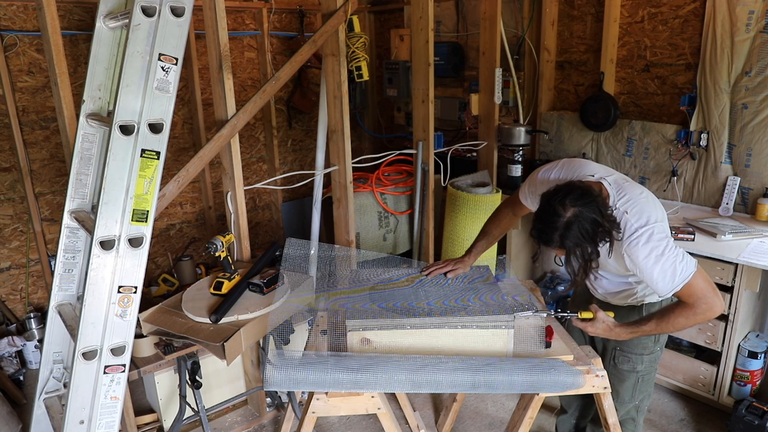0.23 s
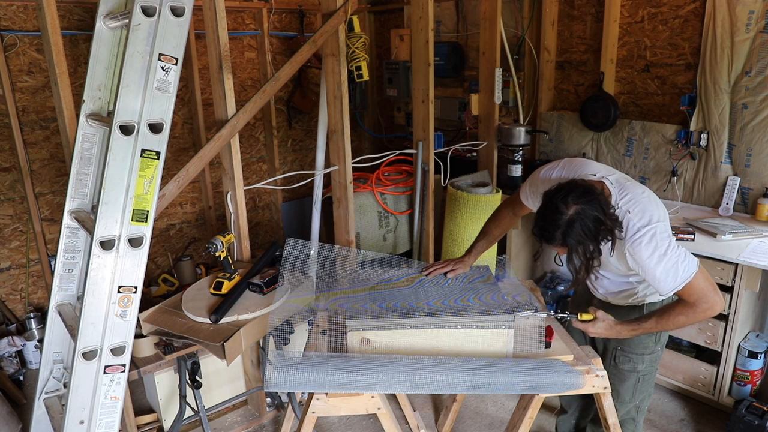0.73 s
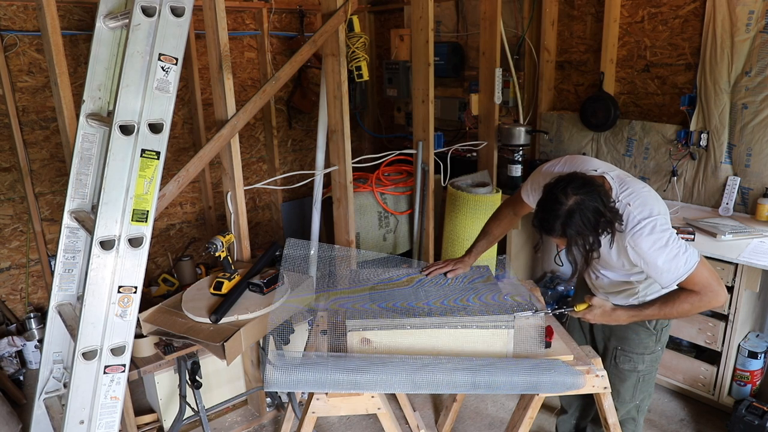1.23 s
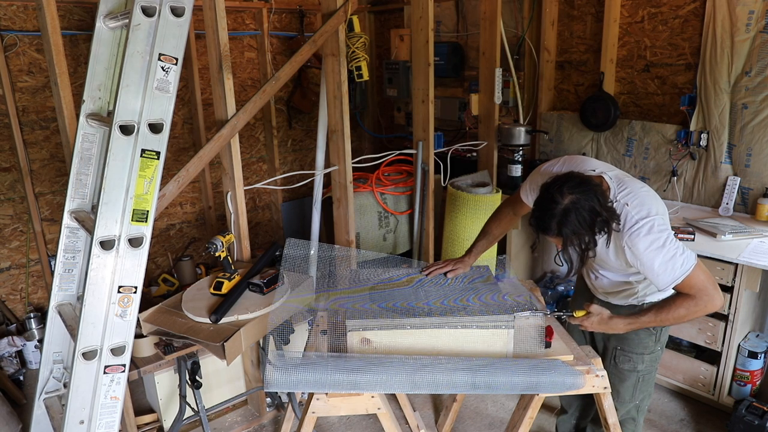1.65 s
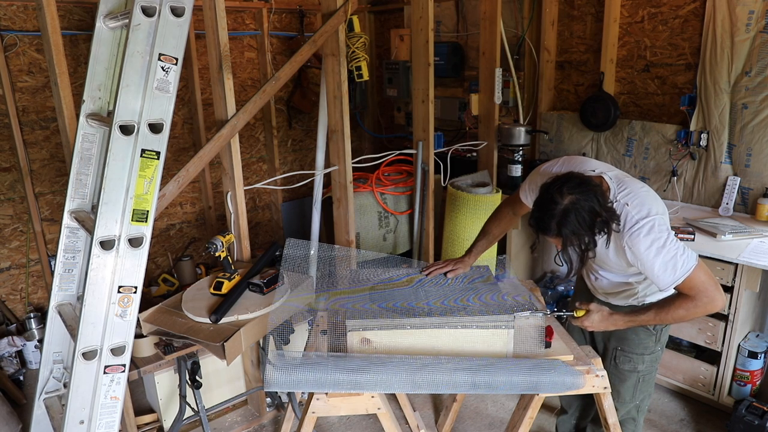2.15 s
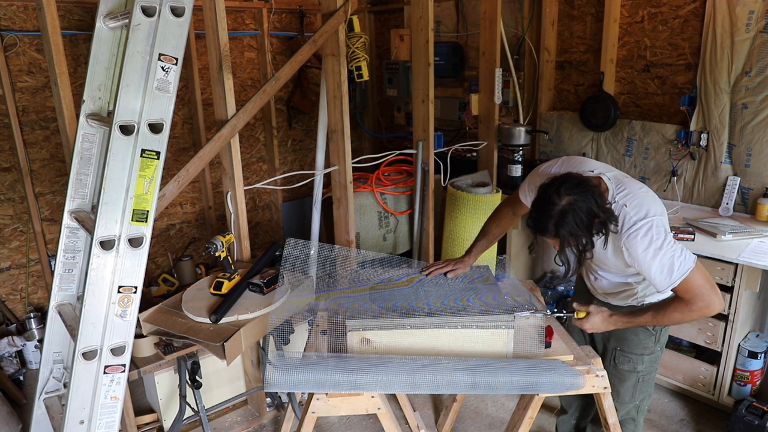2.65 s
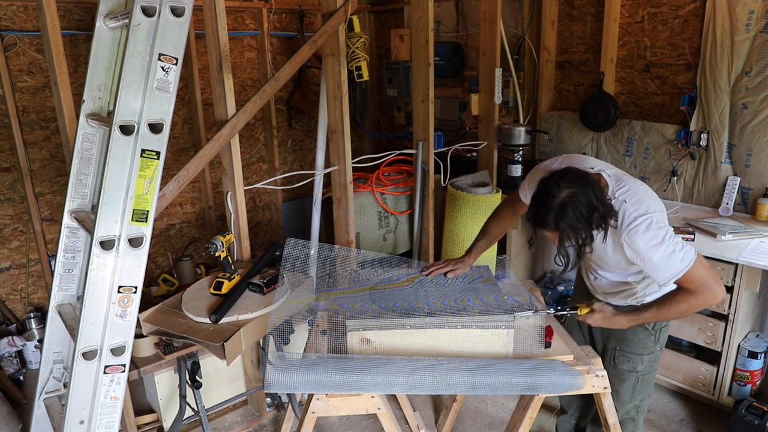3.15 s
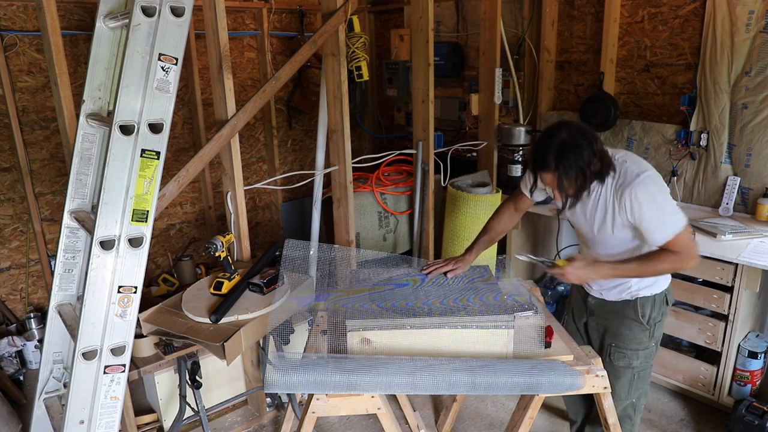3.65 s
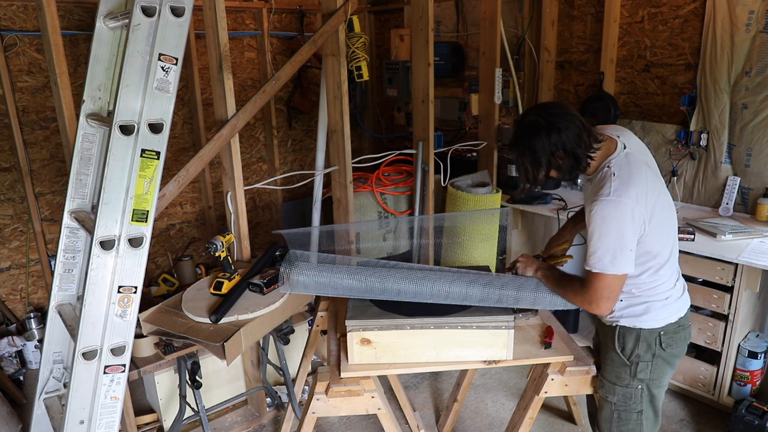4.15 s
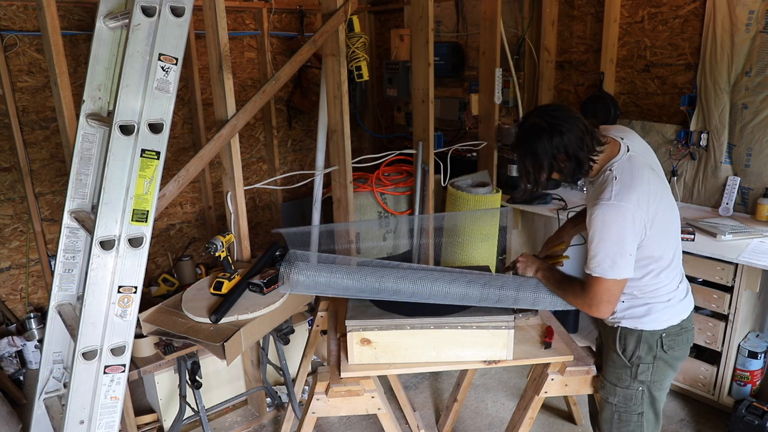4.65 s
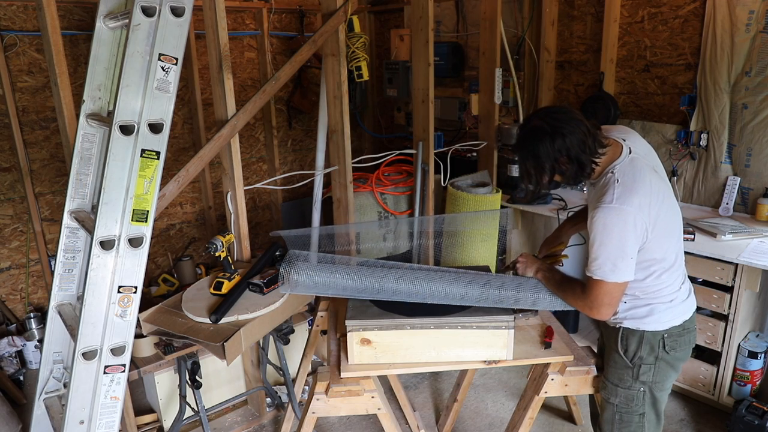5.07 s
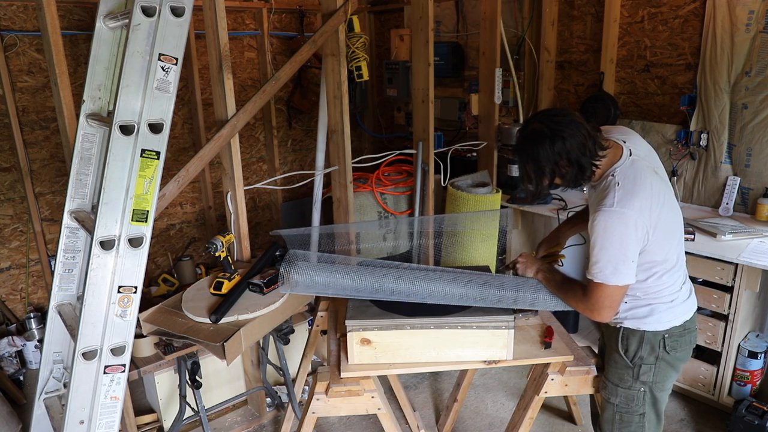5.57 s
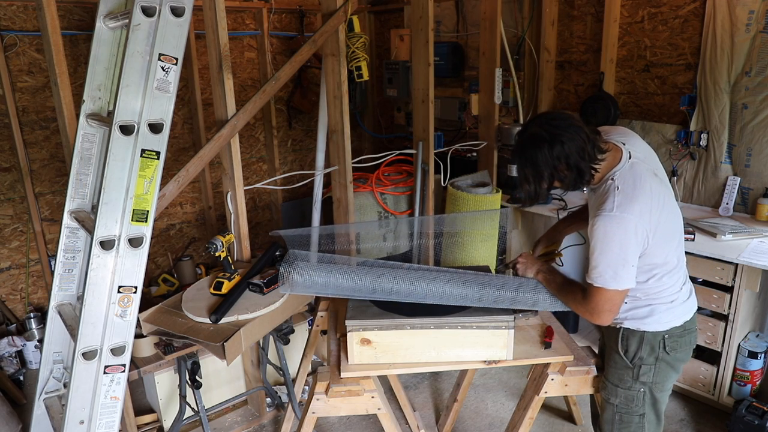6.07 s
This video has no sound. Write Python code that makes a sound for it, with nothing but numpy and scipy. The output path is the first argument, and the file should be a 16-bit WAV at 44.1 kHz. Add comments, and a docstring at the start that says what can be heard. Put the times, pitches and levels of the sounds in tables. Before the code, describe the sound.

The fading tail of a snap opens, then a hand staple gun fires close by at about 0.2, 0.4 and 0.6 seconds, each snap louder than the last. Each is a sharp crack with a brief steel ring, a wooden thump and a short shed echo. The gun and wire mesh knock and rattle softly on the box, most clearly around 1 second. A loud double snap lands at 2.7 seconds. From 3 to 3.8 seconds the mesh rustles, with light bumps and a little scraping. Slightly softer snaps follow: three quick ones around 4 seconds, a pair at 4.5, one at 5, and pairs at 5.5 and 6. Between them the gun drags along the wood in short rubs, while a low murmur from the sawhorses slowly grows. Underneath are quiet air, a deep rumble after the thumps and very faint insects trilling outside.

```python
"""A hand staple gun tacks wire mesh to a wooden box on sawhorses in a timber shed; insects trill outside.
The dying tail of a snap opens, then three snaps hit the side of the box: each rings the steel gun,
thumps the wood and fills the room. Gun and mesh bump about, two more snaps land, then the mesh rustles
and the gun drags along the wood. From about four seconds it works on the top edge, mostly in quick
pairs of snaps with drags between them, while the sawhorses murmur more and more under the weight."""
import sys
import numpy as np
from scipy import signal
from scipy.fft import rfft, irfft, next_fast_len
from scipy.io import wavfile
from scipy.ndimage import uniform_filter1d

SR = 44100
rng = np.random.default_rng(int(sys.argv[2]) if len(sys.argv) > 2 else 0)


def materialize(psi):
    """Save the field psi as 16-bit PCM at rate SR to the path in sys.argv[1].

    A 1-D psi becomes a single channel; in a 2-D psi each row is a channel.
    """
    bounded = np.clip(np.atleast_2d(psi).T, -1, 1)
    quanta = np.round(bounded * 32767).astype(np.int16)
    wavfile.write(sys.argv[1], SR, quanta)


N = 278271
TIME = np.arange(N) / SR
HIT = SR // 2  # samples in a one-shot
TURN_S = 3.85  # the gun moves from the side of the box to its top edge
ON_SIDE, ON_TOP = TIME <= TURN_S, TIME > TURN_S

# Snaps of the gun. Each row: start in seconds, then blow, lever ring, spring ring and box thump in dB.
SNAPS = [(0.196, 0.5, -17, -25, -0.5), (0.4443, 6, -12, -19.5, -1.5), (0.5605, 11.5, -7.5, -16.5, 1.5),
         (2.6665, 6, -13.5, -24, 2.5), (2.7096, 10, -11, -16.5, -4), (3.929, -3.5, -25, -29, 1),
         (3.9707, -1.5, -33, -22, -8), (4.0559, -1, -22, -20.5, -2), (4.535, 0, -29, -14.5, 2),
         (4.585, 4.5, -23.5, -13, -13), (5.0098, -5, -25, -20, 1), (5.4966, -2, -21, -24, 0),
         (5.546, -2, -21.5, -17, -1.5), (5.991, -1.5, -20.5, -26, -1), (6.056, 2, -18.5, -16.5, -6)]


def staple_gun():
    """The driver cracks down, rings the steel, buzzes the coils and kicks the wood: (direct, room send)."""
    # Modes of the three steel parts. Each row: pitch in Hz, level in dB, t60 in seconds.
    casing = [(1387, 9, 0.0096), (1460, -1, 0.012), (1670, 2, 0.004)]
    lever = [(2888, 11.5, 0.01), (3290, 0, 0.018), (8230, -1.5, 0.0047), (2834, -21.5, 0.37)]
    spring = [(4480, 12, 0.0097), (4490, -15, 0.0296), (5750, 6.5, 0.006), (4420, -17, 0.36)]
    # EQ of the crack and of the coils buzzing together. Each row: frequency in Hz, gain in dB.
    crack_eq = [(1000, -39), (2200, -11), (3800, 8), (5500, -0.5), (9000, 0.5), (12000, -2), (16000, -16)]
    buzz_eq = [(1500, -50), (3800, -22), (4500, -16), (5100, -8), (5900, 5), (7000, -11), (14000, -22)]
    # The crack spreading into the room. Each row: frequency in Hz, gain in dB on the side, on the top edge.
    scatter = [(300, -13, -9.5), (913, -2.5, -6), (1375, 8, 10.5), (2290, -2.5, -0.5), (3000, 2.5, 2.5),
               (5680, -1.5, 2), (8600, -5, -10), (12100, -13.5, -12), (16240, -6, -23)]
    side_click = colour(signal.unit_impulse(HIT), [(hz, db) for hz, db, _ in scatter])
    top_click = colour(signal.unit_impulse(HIT), [(hz, db) for hz, _, db in scatter])
    direct, send, kick, coils = np.zeros((4, N))
    for start, blow_db, lever_db, spring_db, thump_db in SNAPS:
        # casing ring and room sound grow more slowly than the blow
        casing_db, room_db = -17.5 + 0.42 * blow_db, 1 + 0.38 * blow_db
        click = side_click if start <= TURN_S else top_click
        detune = 0.01 * rng.standard_normal()
        steel = undb(casing_db) * ring(casing, detune) + undb(lever_db) * ring(lever, detune)
        steel -= undb(spring_db) * ring(spring, detune)
        crack = undb(blow_db) * colour(burst(t60=0.0047), crack_eq)
        add(direct, start, (undb(4.5) * steel + undb(-2.5) * crack) * swell(rise=0.00072))
        add(send, start, undb(room_db) * (undb(-5.5 - blow_db) * steel + undb(16) * click))
        add(kick, start + 0.007906, undb(thump_db) * burst(t60=0.018))
        add(coils, start, undb(spring_db - 4) * burst(t60=0.083))
    # the small steel body radiates almost no bass
    direct = signal.sosfilt(signal.butter(4, 950, "high", fs=SR, output="sos"), direct)
    wood, buzz = box(kick, thud_db=-4.5), colour(coils, buzz_eq)
    return direct + buzz + undb(-11) * wood, send + undb(9) * buzz + wood


def box(force, thud_db):
    """The box answers with its modes and a dull thud, deeper on its broad side than on its top edge."""
    # Wood modes. Each row: pitch in Hz, level in dB struck on the side, on the top edge, t60 in seconds.
    modes = [(116, -10, -14, 0.091), (237, -0.5, -17, 0.087), (280.8, -5.5, -0.5, 0.378),
             (310, 0.5, -1, 0.064), (343, 4, 5.5, 0.11), (487, -6.5, -16.5, 0.53), (524, 6, 3, 0.052),
             (628, -10.5, -12, 0.051), (839, 2, 1, 0.17), (889, 11.5, 6, 0.05), (1103, -5.5, -11.5, 0.28)]
    # Thud of the boards. Each row: frequency in Hz, gain in dB struck on the side, on the top edge.
    thud_eq = [(50, 1, -38), (107, -10, -17), (184, -3.5, -1), (277, -4, 11.5), (560, 2, 1),
               (905, -3.5, -7), (1410, -5, -0.5), (4100, -61, -40)]
    side, top = force * ON_SIDE, force * ON_TOP
    body = through(side, ring([(hz, db, t60) for hz, db, _, t60 in modes]))
    body += through(top, ring([(hz, db, t60) for hz, _, db, t60 in modes]))
    thud = colour(side, [(hz, db) for hz, db, _ in thud_eq])
    thud += colour(top, [(hz, db) for hz, _, db in thud_eq])
    return undb(-47) * body + undb(thud_db) * thud


def clatter():
    """The dying tail of a snap opens; then gun and mesh knock softly on the box with a short wire rattle."""
    # The snap's tail, then the knocks.
    # Each row: start in seconds, wood level in dB, wire level in dB, rattle t60 in seconds.
    events = [(0.002, -10.5, 1.5, 0.022), (0.844, -26, -20.5, 0.05), (0.9, -25, -11, 0.074),
              (0.942, -4.5, 1.5, 0.048), (0.961, -12.5, -0.5, 0.045), (1.079, -7.5, -14.5, 0.038),
              (1.243, -25, -21, 0.088), (1.515, -15.5, -15, 0.046), (2.141, -26, -20.5, 0.028),
              (2.256, -9, -15, 0.046), (3.104, -6.5, -4.5, 0.051), (3.34, -19, -20, 0.048),
              (3.52, -20.5, -18, 0.031), (3.629, -23, -10.5, 0.031)]
    # EQ of the wire rattle. Each row: frequency in Hz, gain in dB.
    rattle_eq = [(200, -6.5), (700, -6), (1200, 1), (2800, 1), (4200, -7), (5800, -5), (8500, -14.5),
                 (15000, -25.5)]
    rise_s = 0.0037
    push, wire = np.zeros((2, N))
    for start, wood_db, wire_db, t60 in events:
        add(push, start, undb(wood_db) * burst(2.38 * t60) * swell(2 * rise_s))
        add(wire, start, undb(wire_db) * fade(t60) * swell(rise_s) * grains(HIT, spread_db=1.5))
    return box(push, thud_db=4.5) + colour(wire, rattle_eq)


def jostled_parts():
    """A knocked board or wire rings with a cluster of close modes."""
    # Each row: start in seconds, centre pitch in Hz, level per mode in dB, t60 in seconds.
    parts = [(0.204, 108, -27, 0.13), (0.45, 102, -29, 0.11), (0.569, 3800, -19, 0.0069),
             (0.840, 2780, -41, 0.016), (0.949, 220, -31, 0.097), (0.961, 1116, -21, 0.018),
             (0.965, 3010, -14, 0.0096), (2.264, 225, -37.5, 0.15), (2.971, 2800, -46, 0.013),
             (3.116, 502, -29.5, 0.1), (3.106, 11000, -41, 0.042), (3.347, 8180, -50, 0.18),
             (3.635, 4350, -34, 0.014), (3.798, 1450, -41.5, 0.028), (3.935, 523, -30.5, 0.084),
             (3.934, 865, -29.5, 0.11)]
    ringing = np.zeros(N)
    for start, hz, db, t60 in parts:
        cluster = [(hz * (1 + 0.05 * offset), db, t60) for offset in rng.standard_normal(12)]
        add(ringing, start, ring(cluster) * swell(rise=4 / hz))
    return ringing


def drags():
    """The nose of the gun rubs along the wood to the next spot and the box groans."""
    # Each row: start in seconds, length in seconds, level in dB.
    moves = [(3.06, 0.098, -33.5), (3.32, 0.025, -38), (4.258, 0.037, -28), (4.34, 0.013, -36),
             (4.715, 0.1, -26.5), (5.21, 0.11, -26), (5.728, 0.07, -28), (6.195, 0.085, -28)]
    # EQ of the groan. Each row: frequency in Hz, gain in dB.
    groan_eq = [(80, 4), (210, 1.5), (280, 5.5), (400, 6), (520, 4), (660, 5.5), (850, -4.5), (1200, -7.5),
                (5000, 11.5)]
    friction = grains(N, spread_db=1.5)
    groan = unit(colour(box(friction, thud_db=-15.5), groan_eq))
    return groan * strokes(moves, attack=0.013, release_t60=0.34)


def mesh():
    """The mesh flexes under the hand: wires tick over each other in uneven flurries."""
    # Each row: start in seconds, length in seconds, level in dB.
    rustles = [(1.52, 0.14, -45.5), (3.055, 0.1, -40), (3.23, 0.16, -42), (3.44, 0.22, -47),
               (3.74, 0.054, -42)]
    # EQ of the rustle. Each row: frequency in Hz, gain in dB.
    rustle_eq = [(300, -1), (1200, 5), (3000, -1.5), (4800, -2), (8500, -16), (12000, -21), (15000, -24)]
    ticks = grains(N, spread_db=3.5) * undb(1.5 * walk(rate=40))
    return unit(colour(ticks, rustle_eq)) * strokes(rustles, attack=0.015, release_t60=0.12)


def sawhorses():
    """The sawhorses murmur more and more under the weight leaning on the top edge."""
    # EQ of the low murmur. Each row: frequency in Hz, gain in dB.
    murmur_eq = [(50, -11), (110, 6), (190, 3.5), (280, 0), (380, -25), (700, -26), (2000, -67)]
    growth_db_per_s, fade_in_s = 2.5, 0.58
    leaning_s = np.maximum(TIME - TURN_S, 0)
    weight = undb(-41.5 + growth_db_per_s * leaning_s) * np.minimum(leaning_s / fade_in_s, 1)
    return weight * unit(colour(rng.standard_normal(N), murmur_eq))


def shed():
    """Room response: dense echoes off bench and studs build into a tail whose treble dies first."""
    # Reverb bands. Each row: frequency in Hz, t60 in seconds, level in dB.
    bands = [(58.5, 0.97, -2.5), (155, 0.76, 0.5), (372, 0.51, 4.5), (1040, 0.45, -3.5), (1500, 0.39, -1),
             (2720, 0.37, 0.5), (4570, 0.41, 0.5), (7000, 0.38, -3.5), (10700, 0.31, -2.5),
             (16100, 0.21, -14)]
    hz, t60, db = np.transpose(bands)
    t = TIME[:SR]
    echoes = rfft(rng.standard_normal(SR))
    log_hz = np.log(np.maximum(np.arange(len(echoes)), 1))
    tail = 0
    for share, decay, gain in zip(np.eye(len(hz)), t60, undb(db)):
        band_echoes = irfft(echoes * np.interp(log_hz, np.log(hz), share))
        tail += gain * band_echoes * np.exp(-np.log(1000) * t / decay)
    onset = np.clip((t - 0.002) / 0.00076, 0, 1)
    build_up = 1 - 0.24 * np.exp(-t / 0.089)
    return undb(-31.5) * tail * onset * build_up


def rumble():
    """A deep rumble in the shed swells after every thump on the box, drops quickly, then lingers."""
    # EQ of the rumble. Each row: frequency in Hz, gain in dB.
    rumble_eq = [(12, -6), (24, -8), (33, 14), (41, 0), (50, -51), (63, -6), (80, -13), (112, -11),
                 (170, -23.5), (400, -61.5)]
    deep = signal.hilbert(colour(rng.standard_normal(N), rumble_eq), next_fast_len(N))[:N]
    levelled = unit(deep.real / uniform_filter1d(np.abs(deep), size=5000))
    lag_s, rise_s = 0.036, 0.052
    bloom = undb(-39) * stroke(lag_s, rise_s, rise_s, release_t60=1.0)
    linger = undb(-42.5) * stroke(lag_s, rise_s, rise_s, release_t60=6)
    power = np.full(N, undb(-54) ** 2)  # resting level
    for start, *_, thump_db in SNAPS:
        add(power, start, (undb(thump_db) * (bloom + linger)) ** 2)
    waver = undb(3 * walk(rate=16))
    return levelled * np.sqrt(power) * waver


def air():
    """A quiet, gently wavering bed of air."""
    # EQ of the air. Each row: frequency in Hz, gain in dB.
    air_eq = [(20, 0), (60, -1.5), (220, -3.5), (350, -8), (500, -6.5), (800, -14), (2000, -19.5),
              (4500, -24.5), (9000, -29.5), (16000, -32)]
    return undb(-47.5 + walk(rate=6.05)) * unit(colour(rng.standard_normal(N), air_eq))


def insects():
    """Insects trill outside: a high band that swells in bouts over a steady lower one."""
    # Each row: start in seconds, length in seconds, level in dB.
    bouts = [(0, 2.31, -63.5), (3.81, 1.62, -63.5)]
    trill = undb(-73) + strokes(bouts, attack=0.014, release_t60=0.53)
    return trill * band(hz=7360, width_hz=380) + undb(-62) * band(hz=5720, width_hz=830)


def undb(db):
    """Decibels to gain."""
    return 10 ** (np.asarray(db) / 20)


def unit(x):
    """Scale to rms 1."""
    return x / np.sqrt(np.mean(x ** 2))


def add(track, start, sound):
    """Mix a sound in at a start time in seconds."""
    first = max(int(start * SR), 0)
    track[first:first + len(sound)] += sound[:N - first]


def fade(t60):
    """One-shot decay, falling 60 dB in t60 seconds."""
    return np.exp(-np.log(1000) * TIME[:HIT] / t60)


def swell(rise):
    """One-shot attack: a force building up to 1."""
    return 1 - np.exp(-(TIME[:HIT] / rise) ** 2)


def stroke(start, length, attack, release_t60):
    """Envelope of one movement: it builds up, holds and dies away; all times in seconds."""
    age = np.maximum(TIME - start, 0)
    onset = 1 - np.exp(-(age / attack) ** 2)
    return onset * np.exp(-np.log(1000) * np.maximum(age - length, 0) / release_t60)


def strokes(rows, attack, release_t60):
    """Envelope of several movements that share one attack and release."""
    return sum(undb(db) * stroke(start, length, attack, release_t60) for start, length, db in rows)


def colour(x, eq):
    """Minimum-phase filter through the (Hz, dB) points of an EQ curve."""
    n = 2 * next_fast_len(len(x) // 2 + 2 ** 11)
    hz, db = np.transpose(eq)
    log_hz = np.log(np.maximum(np.arange(n // 2 + 1) * SR / n, 1))
    cepstrum = irfft(np.log(undb(np.interp(log_hz, np.log(hz), db))))
    cepstrum[1:n // 2] *= 2
    cepstrum[n // 2 + 1:] = 0
    return irfft(rfft(x, n) * np.exp(rfft(cepstrum)), n)[:len(x)]


def through(x, response):
    """Play a sound through an impulse response."""
    return signal.fftconvolve(x, response)[:N]


def ring(modes, detune=0):
    """Decaying sines of a struck body."""
    phase_per_hz = 2 * np.pi * (1 + detune) * TIME[:HIT]
    return sum(undb(db) * fade(t60) * np.sin(hz * phase_per_hz) for hz, db, t60 in modes)


def burst(t60):
    """A decaying shot of white noise."""
    return rng.standard_normal(HIT) * fade(t60)


def grains(n, spread_db):
    """Dense tiny contacts of very unequal size."""
    return unit(rng.standard_normal(n) * undb(spread_db * np.minimum(rng.exponential(size=n), 6)))


def walk(rate):
    """Smooth random wander of rms 1, with rate steps a second."""
    hold = int(SR / rate)
    steps = np.repeat(rng.standard_normal(N // hold + 1), hold)
    return unit(uniform_filter1d(steps, hold)[:N])


def band(hz, width_hz):
    """Narrow noise around one pitch."""
    offset = (np.arange(N // 2 + 1) * SR / N - hz) / width_hz
    return unit(irfft(rfft(rng.standard_normal(N)) / (1 + (2 * offset) ** 4), N))


def scene():
    """The gun sits sharply up front; the clatter arrives mostly by way of the room."""
    snaps, snap_send = staple_gun()
    clattering, ringing = clatter(), jostled_parts()
    send = snap_send + clattering + undb(-1.5) * ringing
    # each working position has its own pattern of echoes
    room = sum(through(send * position, shed()) for position in (ON_SIDE, ON_TOP))
    handling = undb(-7) * clattering + ringing + mesh() + drags() + sawhorses()
    return (snaps + room + handling + rumble() + air() + insects())[None]


def record(dry):
    """The loudest snaps clip; a steep low-pass cuts the top."""
    top_hz = 15900
    return signal.sosfilt(signal.ellip(10, 0.1, 80, top_hz, fs=SR, output="sos"), np.clip(dry, -1, 1))


dry = scene()
out = record(dry)
materialize(out)
```